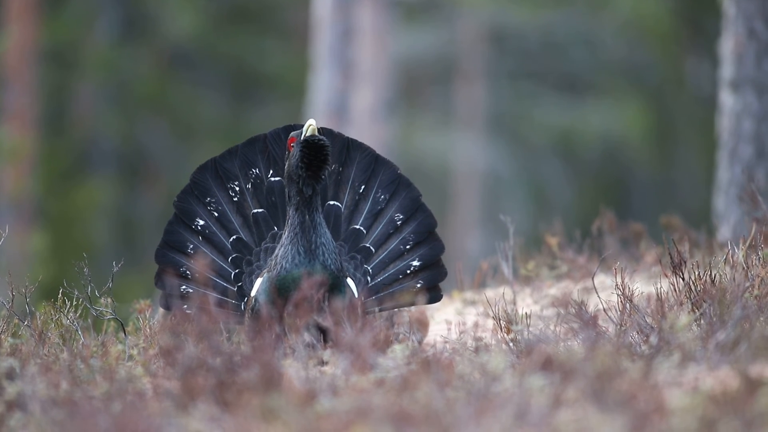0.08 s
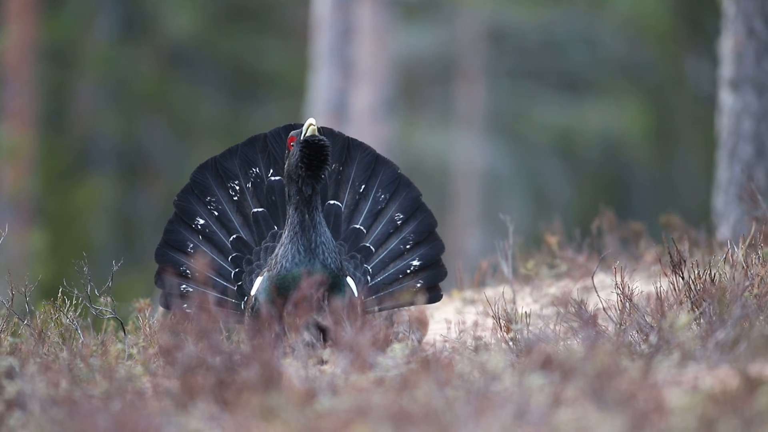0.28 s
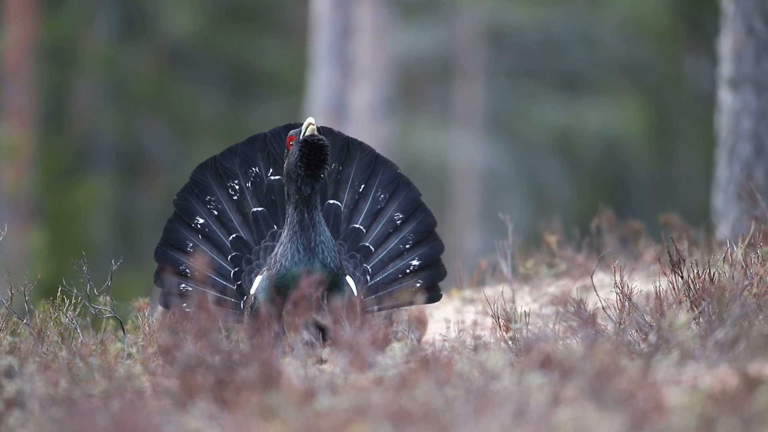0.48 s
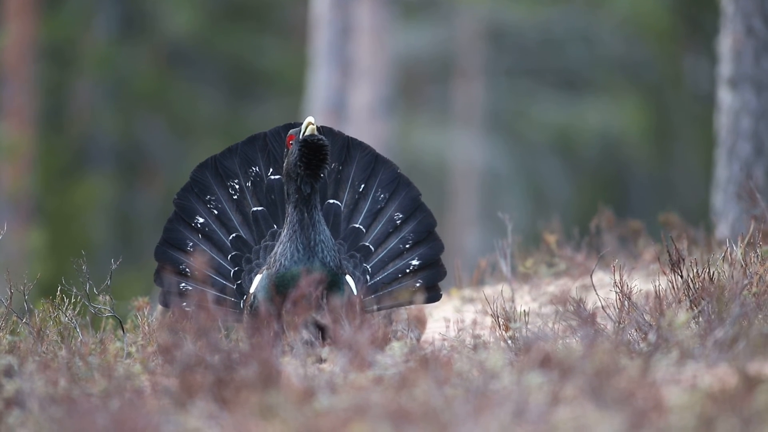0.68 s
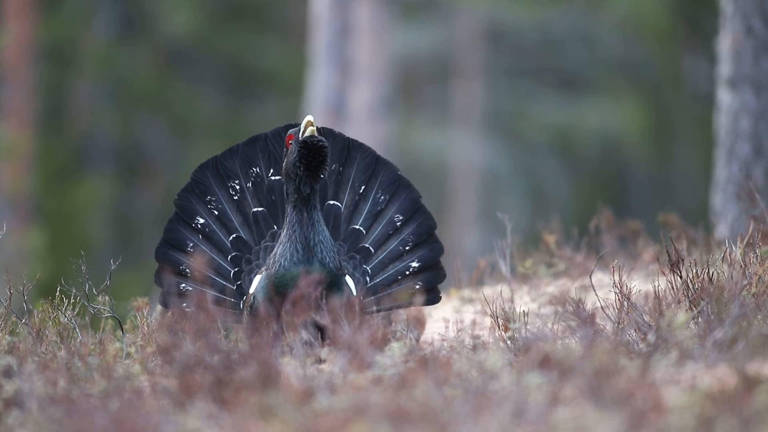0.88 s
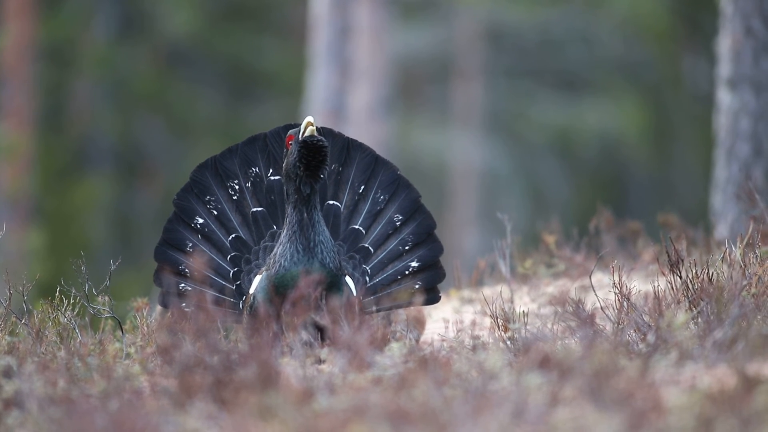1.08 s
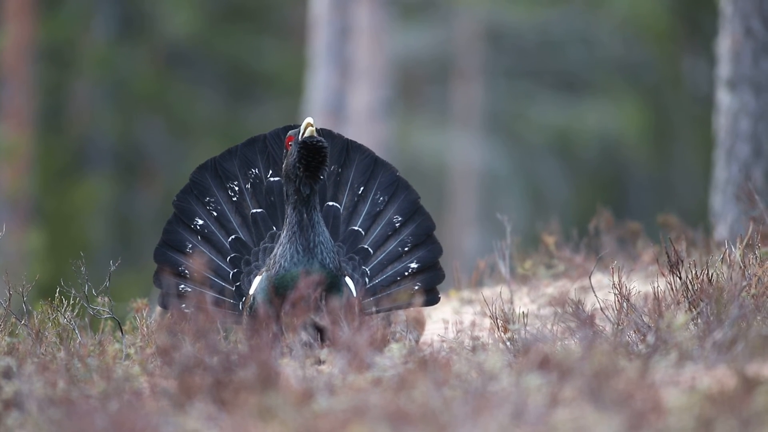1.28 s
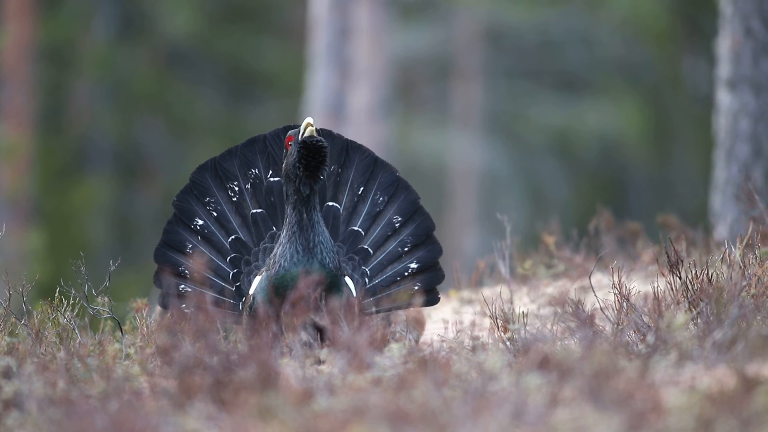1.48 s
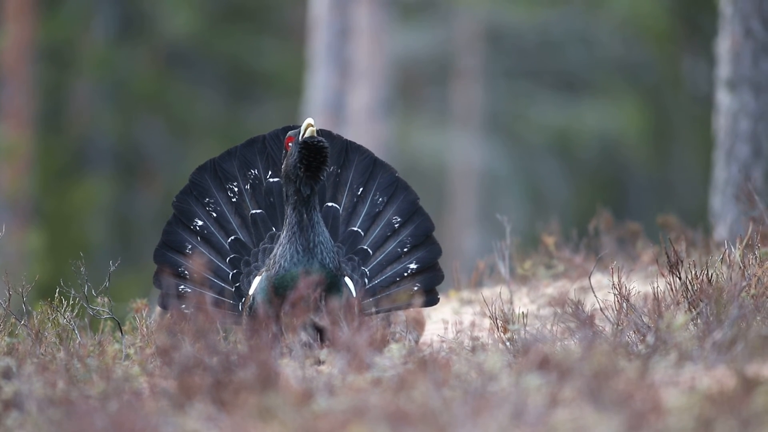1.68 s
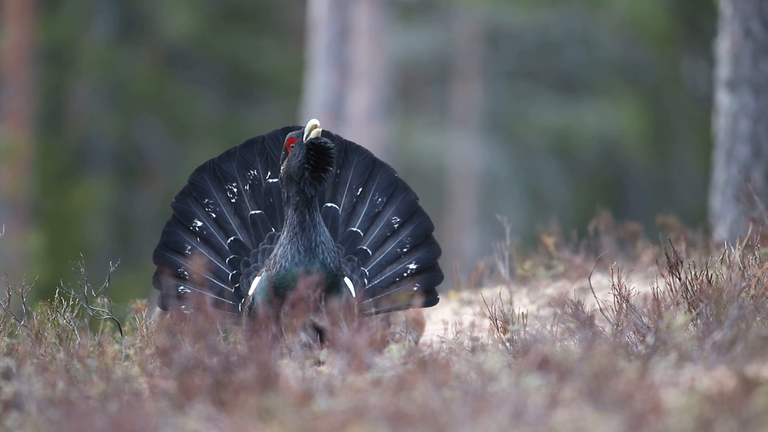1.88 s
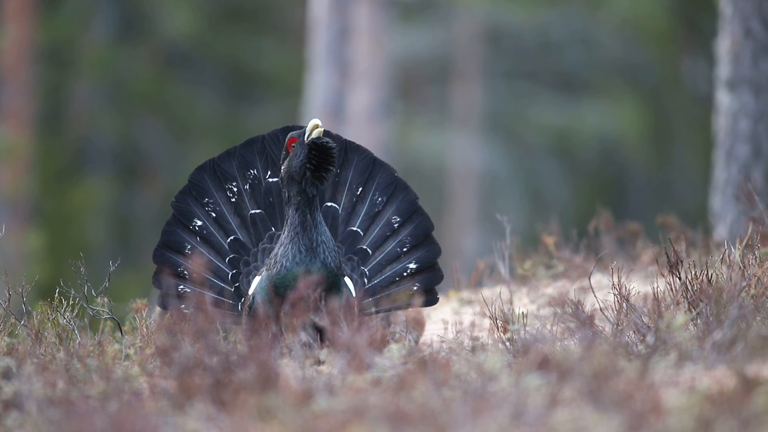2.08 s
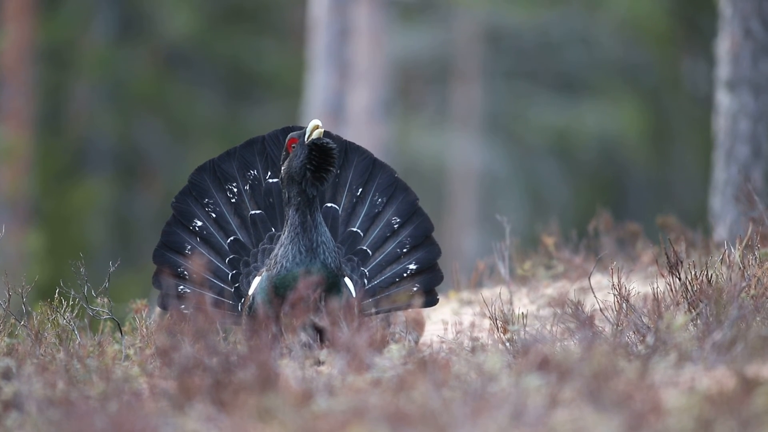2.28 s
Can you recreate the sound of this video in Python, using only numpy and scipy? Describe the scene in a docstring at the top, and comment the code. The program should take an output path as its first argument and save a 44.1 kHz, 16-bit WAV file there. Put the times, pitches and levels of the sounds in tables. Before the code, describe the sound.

A large grouse's dry double click stands out in a quiet pine wood: a bright, hollow snap at about 0.94 seconds, then a duller one at 1.09, each with a short throat ring and light woodland tail. Earlier, at 0.25, a deep soft thump rolls back around 0.55. Faint distant birds whistle and chirp throughout, over low air rumble and slight hiss until 2.3 seconds.

```python
"""A displaying capercaillie in a quiet pine wood gives one dry double click: snaps that ring its throat.
Before it comes a deep, soft thump, two low decaying modes, which rolls back from the forest as noise swells.
Small birds far off among the trunks whistle and chirp in gliding pure tones with a woodland tail.
Under them lie coloured noises: a low rumble of air, the blur of the farthest birds and a faint hiss."""
import sys
import numpy as np
from scipy import signal
from scipy.fft import rfft, irfft, next_fast_len
from scipy.io import wavfile
from scipy.ndimage import map_coordinates

SR = 44100
rng = np.random.default_rng(int(sys.argv[2]) if len(sys.argv) > 2 else 0)


def bounce(signal):
    """Save signal as a 16-bit WAV file at the path given by the first command-line argument."""
    frames = np.transpose(np.atleast_2d(signal))
    limited = np.clip(frames, -1, 1)
    pcm = np.round(limited * 32767).astype(np.int16)
    wavfile.write(sys.argv[1], SR, pcm)


N = 101430
T = np.arange(N) / SR  # time, s


def amp(db):
    """Decibels to gain."""
    return 10 ** (np.asarray(db) / 20)


def unit(x):
    """Scale to rms 1."""
    return x / np.sqrt(np.mean(x ** 2) + 1e-20)


def along(points, hz):
    """Read (Hz, value) points at hz, in straight lines on a log frequency axis."""
    point_hz, value = np.transpose(points)
    return np.interp(np.log(hz + 1), np.log(point_hz + 1), value)


def level_curve(points):
    """Read (s, dB) points over the whole scene, in straight lines."""
    time_s, level_db = np.transpose(points)
    return np.interp(T, time_s, level_db)


def wobble(rate):
    """A smooth random curve through rate normally distributed knots a second."""
    return map_coordinates(rng.standard_normal(1024), [T * rate], mode="wrap")


def filtered(x, response):
    """Multiply the spectrum of x by a response of frequency."""
    size = next_fast_len(N + SR // 2)
    hz = np.fft.rfftfreq(size, 1 / SR)
    return irfft(rfft(x, size) * response(hz), size)[..., :N]


def spread(pair, side_db):
    """Left and right from a centre signal and a weaker side signal."""
    mid, side = pair[0], amp(side_db) * pair[1]
    return np.array([mid + side, mid - side])


def rush(spectrum, side_db):
    """Coloured stereo noise of rms 1."""
    noise = filtered(rng.standard_normal((2, N)), lambda hz: amp(along(spectrum, hz)))
    return unit(spread(noise, side_db))


def rumble():
    """Low rumble of air: coloured noise whose level drifts slightly."""
    # colour of the air: frequency_hz, relative_level_db
    rumble_colour = [(12, -32), (22, -1), (34, -21.5), (50, -2), (68, 0.5), (98, -3), (126, -12.5),
                     (148, -13), (161, -4), (185, -18), (300, -20), (400, -24.5), (580, -25), (1000, -36),
                     (2000, -38.5), (6000, -51.5)]
    # slow course of the level: time_s, level_db
    rumble_course = [(0, -50.5), (.8, -51.5), (1.1, -51), (1.36, -50), (1.55, -50.5), (2.3, -50.5)]
    level_db = level_curve(rumble_course) + 0.55 * wobble(5.35)
    return amp(level_db) * rush(rumble_colour, side_db=-28.5)


def chorus():
    """The farthest birds blur into a band of noise with an unsteady level."""
    # colour of the blur: frequency_hz, relative_level_db
    chorus_colour = [(1200, -29), (2200, -8.5), (3000, 1.5), (3500, -0.5), (4000, -8), (4900, -7.5),
                     (6500, -10.5)]
    # slow course of the level: time_s, level_db
    chorus_course = [(0, -68), (.3, -69), (.5, -67), (.8, -68.5), (1.15, -70), (1.45, -66.5), (1.9, -73.5),
                     (2.3, -70)]
    level_db = level_curve(chorus_course) + 1.6 * wobble(24.82)
    return amp(level_db) * rush(chorus_colour, side_db=-48)


def hiss():
    """Microphone hiss: steady, wide noise that falls gently towards the treble."""
    # colour of the hiss: frequency_hz, relative_level_db
    hiss_colour = [(100, 8.1), (1500, 0.89), (7000, -0.76), (15500, -3)]
    return amp(-67) * rush(hiss_colour, side_db=-2.0)


def note(hz, t, length, rise, fall):
    """A slightly wavering pure tone that fades in and out; phase is the running sum of pitch."""
    gate = np.clip(t / rise, 0, 1) ** 0.6 * np.clip((length - t) / fall, 0, 1)
    wavering_hz = hz * (1 + 0.006 * wobble(130))
    return np.sqrt(2) * gate * np.sin(2 * np.pi * np.cumsum(wavering_hz) / SR)


def whistles():
    """Far whistles glide exponentially into a held pitch while their loudness flutters."""
    # each whistle: start_s, length_s, held_pitch_hz, scoop_hz (starting offset from it), level_db
    whistle_notes = [(-.12, 0.21, 3300, 255, -61), (0.15, 0.15, 4390, 27, -70.5),
                     (0.413, .27, 3368, 283.5, -69), (0.47, 0.17, 4270, 3, -78),
                     (0.704, 0.17, 4390, 31, -74), (.98, .11, 4170, 199.5, -75),
                     (1.035, 0.22, 3320, 251, -64.5), (1.116, 0.15, 4815, 304.5, -76.5),
                     (1.311, 0.17, 4380, 59, -72.5), (1.387, 0.19, 4162, -220, -67),
                     (1.571, 0.17, 4760, 452.5, -70.5), (1.588, .26, 3289, 197.5, -66.5),
                     (1.865, 0.17, 4343, 52, -66.5), (1.87, 0.23, 4118, -220, -70),
                     (2.09, 0.16, 4720, 351.5, -73.5), (2.148, 0.31, 3278, 299.5, -63.5)]
    scoop_s, rise_s, fall_s = 0.03, 0.046, 0.062  # scoop_s is the time constant of the glide
    flutter_db, flutter_rate = 2.5, 70  # depth scale, random knots a second
    out = np.zeros(N)
    for start, length, held_hz, scoop_hz, level_db in whistle_notes:
        t = np.maximum(T - start, 0)
        pitch_hz = held_hz + scoop_hz * np.exp(-t / scoop_s)
        loudness = amp(level_db + flutter_db * wobble(flutter_rate))
        out += loudness * note(pitch_hz, t, length, rise_s, fall_s)
    return out


def chirps():
    """Short chirps sweep in a straight line from one pitch to another."""
    # each chirp: start_s, length_s, first_pitch_hz, last_pitch_hz, level_db
    chirp_notes = [(.035, 0.066, 2540, 3140, -68), (0.423, 0.034, 3350, 2950, -62),
                   (.448, 0.036, 4580, 4850, -70), (0.489, 0.034, 2610, 2920, -62),
                   (0.647, .092, 2650, 3240, -55.5), (.724, .022, 3350, 3000, -58),
                   (0.845, 0.062, 3730, 3640, -72.5), (0.951, .045, 3540, 3930, -63),
                   (1.32, 0.024, 3250, 3770, -63)]
    edge_s = 0.019  # fade at either end
    out = np.zeros(N)
    for start, length, first_hz, last_hz, level_db in chirp_notes:
        t = np.maximum(T - start, 0)
        pitch_hz = np.interp(t, [0, length], [first_hz, last_hz])
        out += amp(level_db) * note(pitch_hz, t, length, edge_s, edge_s)
    return out


def forest(x, side_db):
    """Scatter from the trunks: a noise tail in which each frequency dies at its own speed."""
    # how long the wood rings: frequency_hz, t60_s
    forest_t60 = [(100, 0.41), (1000, .45), (3000, .55), (6000, 1), (12000, 0.05)]
    hz, t, noise = signal.stft(rng.standard_normal((2, SR)), SR, nperseg=256)
    decay = amp(-60 * t / along(forest_t60, hz)[:, None])
    tail = signal.istft(noise * decay, SR, nperseg=256)[1]
    tail = spread(tail, side_db)
    tail /= np.linalg.norm(tail[0])
    return signal.fftconvolve(x[None], tail, axes=1)[:, :N]


def songbirds():
    """Distant whistles smear among the trees; the nearer chirps stay drier."""
    far, nearer = whistles(), chirps()
    into_trees = amp(-3.5) * far + amp(-12.5) * nearer
    return far + nearer + forest(into_trees, side_db=-46)


def thump_echoes():
    """The forest returns the thump as swells of low noise."""
    # each return: centre_s, width_s (standard deviation), level_db
    echo_swells = [(0.472, .025, -48), (0.55, 0.028, -42.5), (.63, 0.042, -49)]
    # colour of the returns: frequency_hz, relative_level_db
    echo_colour = [(25, -40), (55, 6.5), (80, 4), (105, -14), (160, -11), (500, -90)]
    swell = sum(amp(level_db) * np.exp(-0.5 * ((T - centre) / width) ** 2)
                for centre, width, level_db in echo_swells)
    return swell * rush(echo_colour, side_db=-53)


def thump():
    """A soft blow swells two low modes in opposite directions; the forest returns it."""
    # the blow: start_s, level_db
    start, blow_db = (0.2398, 0)
    # what it rings with: frequency_hz, relative_level_db, rise_s, t60_s
    thump_modes = [(66.8, -3, 0.027, 0.15), (91.8, 11.5, 0.026, 0.057)]
    t = np.maximum(T - start, 0)
    blow = np.zeros(N)
    for k, (hz, level_db, rise, t60) in enumerate(thump_modes):
        swell = 1 - np.exp(-(t / rise) ** 2)
        direction = (-1) ** (k + 1)
        blow += direction * amp(level_db - 60 * t / t60) * swell * np.sin(2 * np.pi * hz * t)
    left_over_right_db = 0.2
    pan = amp(np.array([[1], [-1]]) * left_over_right_db / 2)
    return pan * (amp(blow_db) * blow + thump_echoes())


def causal(colour_db, size=2048):
    """Minimum-phase impulse response of energy 1 with the given colour, by folding its cepstrum."""
    cepstrum = irfft(np.log(amp(colour_db(np.fft.rfftfreq(size, 1 / SR)))))
    cepstrum[1:size // 2] *= 2
    cepstrum[size // 2 + 1:] = 0
    response = irfft(np.exp(rfft(cepstrum)))
    return response / np.linalg.norm(response)


def throat_ring(t, opening):
    """Decaying throat resonances, whose balance follows the beak opening."""
    # resonances: frequency_hz, t60_s, open_beak_db, nearly_closed_beak_db (both relative)
    throat_modes = [(255, 0.086, -10.5, -18), (319.6, 0.073, -10.5, -13.5), (816, 0.07, -18.5, -23),
                    (1445, .066, -9, -34), (2120, 0.049, -4.5, -4), (2310, 0.059, -24, -8.5),
                    (2605, 0.054, -3, -8), (2696, 0.031, -20, -8), (2955, 0.028, 1.5, -8),
                    (3015, 0.07, -10, -5.5), (3500, 0.014, -20, -24), (3940, 0.044, -9.5, -28),
                    (4480, 0.051, -15, -24), (5180, 0.044, -21, -18.5)]
    rise_s = 0.00053  # time constant
    ring = np.zeros(N)
    for hz, t60, open_db, closed_db in throat_modes:
        level_db = opening * open_db + (1 - opening) * closed_db
        ring += amp(level_db - 60 * t / t60) * np.cos(2 * np.pi * hz * t)
    return ring * (1 - np.exp(-t / rise_s))


def beak_crack(start, t, opening):
    """A one-sample snap and a short, duller noise burst, coloured by the beak."""
    # colour with the beak open: frequency_hz, relative_level_db
    crack_open = [(300, -13.5), (1800, -20.5), (2500, -5), (2950, 2.5), (3900, 0), (4500, -2), (4950, -23),
                  (5400, -14), (6100, -6.5), (6900, -31), (8300, -20), (15000, -53)]
    # colour with the beak nearly closed: frequency_hz, relative_level_db
    crack_closed = [(300, -24), (1700, -34.5), (2200, 0.5), (2800, 4.5), (3200, -9.5), (3800, -23),
                    (5200, -25), (6000, -30), (9500, -36), (15000, -42)]
    snap_db, t60_s, dull_hz = 14, 0.018, 8600  # the burst keeps little above dull_hz
    scrape = filtered(rng.standard_normal(N), lambda hz: 1 / (1 + (hz / dull_hz) ** 4))
    burst = (t > 0) * amp(-60 * t / t60_s) * scrape / 2
    burst[round(start * SR)] += amp(snap_db)
    beak = causal(lambda hz: opening * along(crack_open, hz) + (1 - opening) * along(crack_closed, hz))
    return signal.fftconvolve(burst, beak)[:N]


def clicks():
    """Each click is a snap with a short crack, and rings the throat; the open beak is brighter."""
    # each click: start_s, ring_level_db, beak_opening (0-1), crack_level_db
    click_events = [(0.9427, -32.5, 0.95, -28.5), (1.0943, -34.5, 0.16, -29.5)]
    out = np.zeros((2, N))
    for start, ring_db, opening, crack_db in click_events:
        t = np.maximum(T - start, 0)
        click = amp(ring_db) * throat_ring(t, opening) + amp(crack_db) * beak_crack(start, t, opening)
        out += click + amp(-17) * forest(click, side_db=-45)
    return out


def scene():
    """All that sounds in the wood, as it reaches the microphones."""
    return rumble() + chorus() + hiss() + songbirds() + thump() + clicks()


def record(dry):
    """The recorder keeps nothing from its band limit upwards."""
    top_hz = 15750
    return filtered(dry, lambda hz: hz < top_hz)


dry = scene()
out = record(dry)
bounce(out)
```